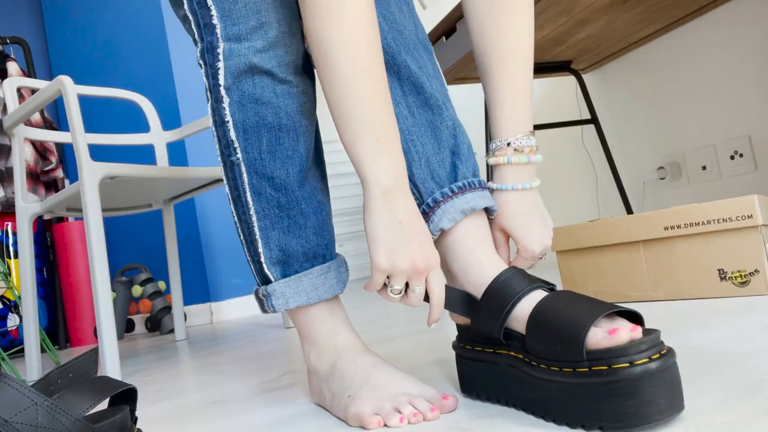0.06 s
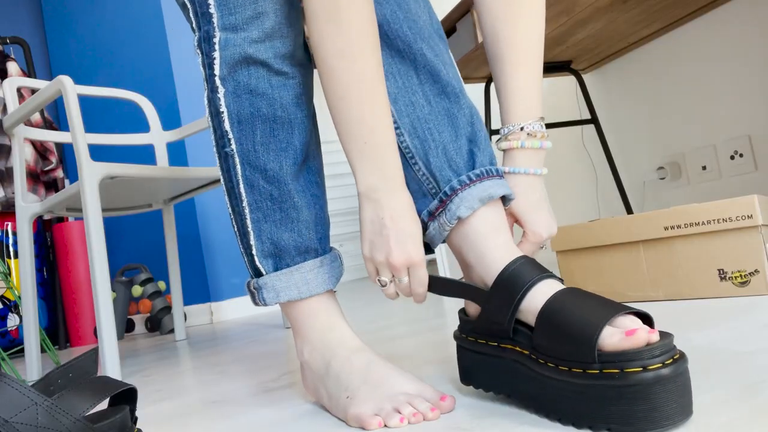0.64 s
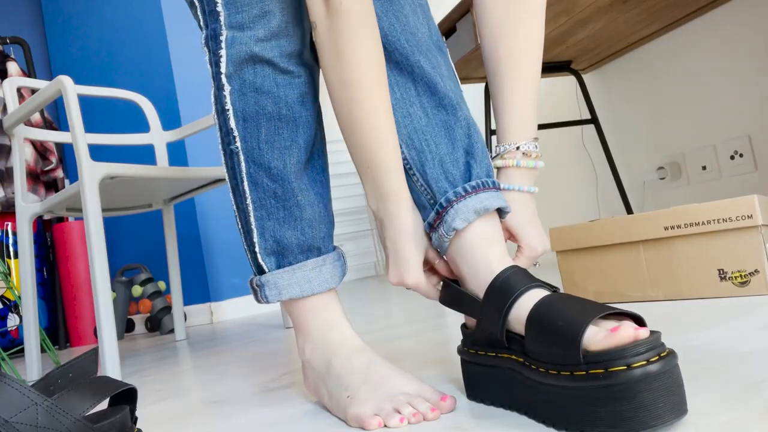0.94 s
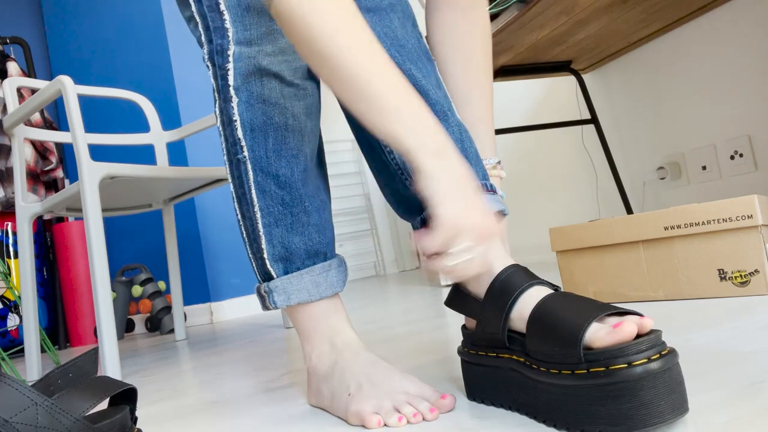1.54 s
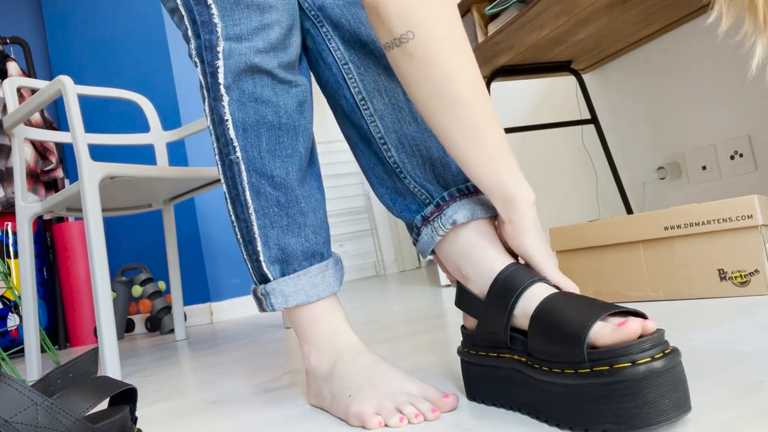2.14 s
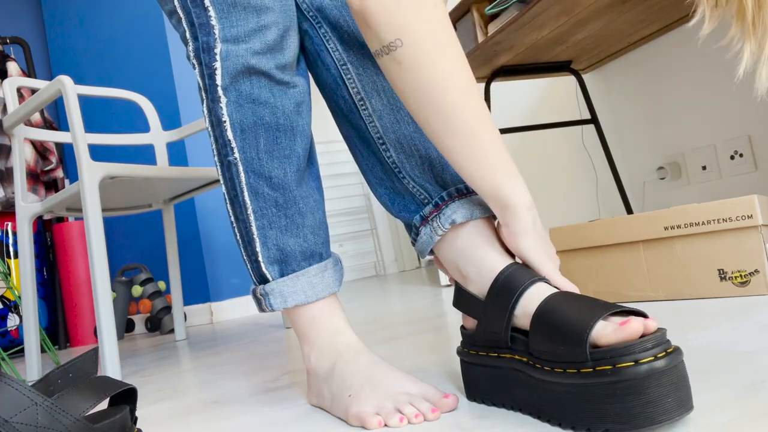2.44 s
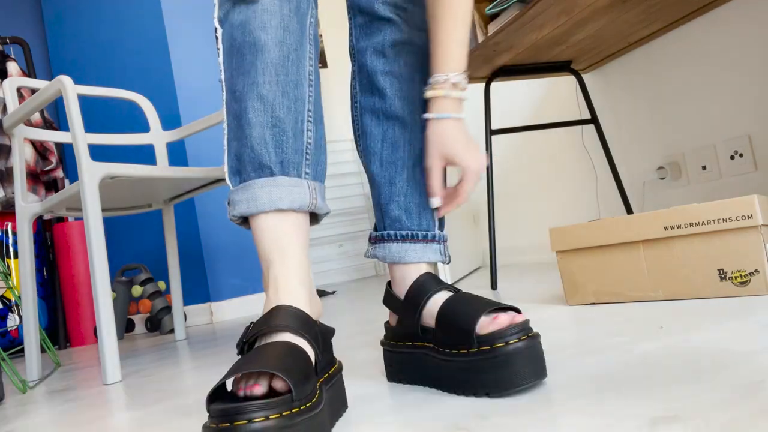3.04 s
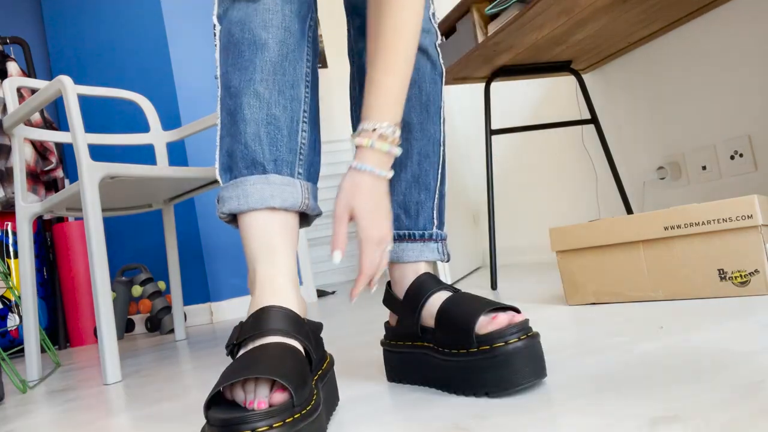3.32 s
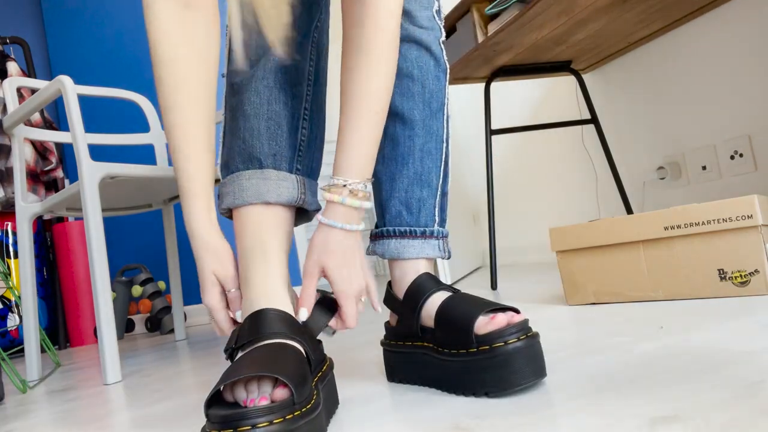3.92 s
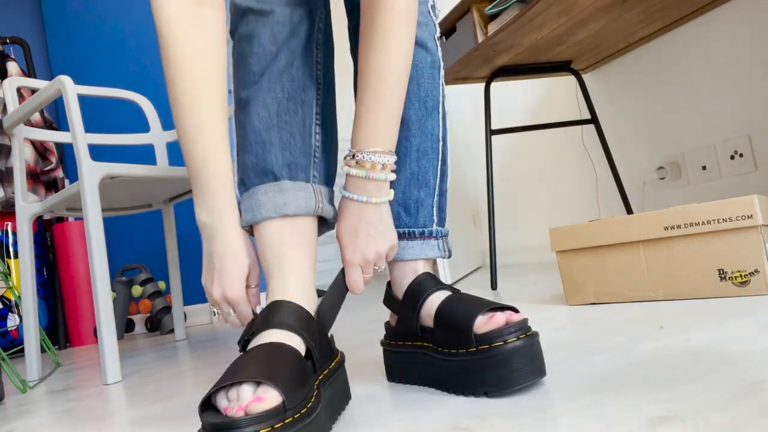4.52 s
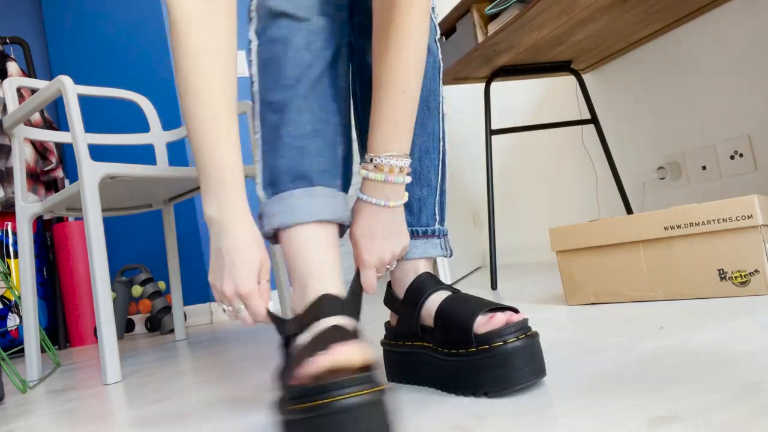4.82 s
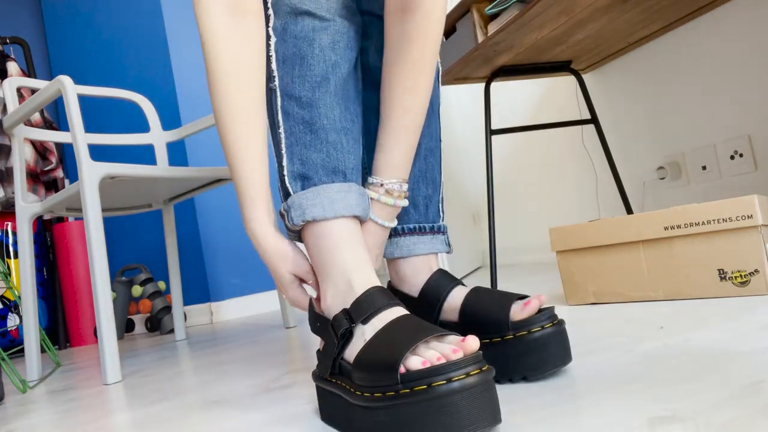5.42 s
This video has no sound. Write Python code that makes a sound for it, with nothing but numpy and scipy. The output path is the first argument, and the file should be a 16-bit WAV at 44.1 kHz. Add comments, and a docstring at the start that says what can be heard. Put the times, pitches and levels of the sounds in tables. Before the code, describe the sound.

Platform sandals are put on in a small room, heard from a microphone on the floor close to the feet. From the start, leather straps rub on skin and denim cuffs swish in short, soft strokes, while buckles and bead bracelets tick irregularly. A rubber sole thuds dully at about 0.3 and 0.85 seconds. Light ticks continue until about 2.3 seconds, followed by a brief lull. At 3.1 seconds a thick sole lands on the hard floor with a loud, hollow clop and a short low boom, and the rubbing picks up. A joint gives one small dry crack at 3.9 seconds. Another loud clop comes at 4.2, then slightly softer ones at 4.6 and 5.2, with a low thud at 4.9. Sharper buckle ticks fall near 4.1 and 5 seconds among busier strap rubbing. Faint, rumbling room tone lies underneath throughout.

```python
"""Thick rubber soles clop on a hard floor as platform sandals are put on in a small room.
The microphone sits on the floor, close to the feet, where each landing sets the low room modes booming.
Leather straps and denim cuffs rub in short strokes, buckles and bead bracelets tick,
and a joint cracks once. Faint room tone lies underneath."""
import sys
import numpy as np
from scipy import signal
from scipy.fft import rfft, irfft, next_fast_len
from scipy.io import wavfile
from scipy.ndimage import uniform_filter1d, map_coordinates

SR = 44100
rng = np.random.default_rng(int(sys.argv[2]) if len(sys.argv) > 2 else 0)


def materialize(psi):
    """Save the field psi as 16-bit PCM at rate SR to the path in sys.argv[1].

    A 1-D psi becomes a single channel; in a 2-D psi each row is a channel.
    """
    bounded = np.clip(np.atleast_2d(psi).T, -1, 1)
    quanta = np.round(bounded * 32767).astype(np.int16)
    wavfile.write(sys.argv[1], SR, quanta)


N = 249667

# how alike the room sounds at the left and right microphone ports: frequency_hz, coherence
COHERENCE = [(60, 0.85), (150, .88), (250, 0.62), (500, 0), (1500, 0.056), (6000, 0)]
# hollow resonance of rubber brushing the floor: pitch_hz, width_hz, level_db
SCUFF_MODES = [(790, 500, 0)]


def amp(db):
    return 10 ** (np.asarray(db) / 20)


def unit(x):
    return x / np.sqrt(np.mean(x ** 2) + 1e-20)


def along(points, hz):
    """Interpolate (frequency_hz, value) points on a log frequency axis."""
    frequencies, values = np.transpose(points)
    return np.interp(np.log(hz + 1), np.log(frequencies + 1), values)


def arch(u):
    """Rises and falls once while u goes from 0 to 1."""
    return np.sin(np.pi * np.clip(u, 0, 1))


def wobble(rate_hz):
    """A smooth random curve."""
    knots = rng.standard_normal(int(N * rate_hz / SR) + 4)
    return map_coordinates(knots, [np.arange(N) * rate_hz / SR])


def add(track, start_s, sound):
    """Mix a sound into the track."""
    part = track[:, max(round(start_s * SR), 0):][:, :sound.shape[1]]
    part += sound[:, :part.shape[1]]


def filtered(x, response):
    """Multiply the spectrum of x by response(hz)."""
    n = x.shape[-1]
    size = next_fast_len(n + SR // 4)
    return irfft(rfft(x, size) * response(np.fft.rfftfreq(size, 1 / SR)), size)[..., :n]


def pulse(gain, size=4096):
    """The shortest causal pulse with the given gain at each frequency."""
    cepstrum = irfft(np.log(np.maximum(gain(np.fft.rfftfreq(size, 1 / SR)), 1e-6)))
    cepstrum[1:size // 2] *= 2
    cepstrum[size // 2 + 1:] = 0
    return irfft(np.exp(rfft(cepstrum)))


def resonances(modes, hz):
    """Gain of a set of damped resonances."""
    return np.sqrt(sum(abs(amp(db) * hz * width / (pitch ** 2 - hz ** 2 + 1j * hz * width)) ** 2
                       for pitch, width, db in modes))


def port_angle(hz):
    """Phase angle between the microphone ports: shorter waves arrive further out of step."""
    return np.arccos(np.clip(along(COHERENCE, hz), -1, 1))


def diffuse(pair):
    """Two unrelated signals become a diffuse field: alike in the bass, unrelated in the treble."""
    weights = lambda hz: np.array([np.cos(port_angle(hz) / 2), np.sin(port_angle(hz) / 2)])
    mid, side = filtered(pair, weights)
    return np.array([mid + side, mid - side])


def coloured(pair, spectrum):
    """A diffuse field of rms 1 with the given spectrum."""
    return unit(diffuse(filtered(pair, lambda hz: amp(along(spectrum, hz)))))


def room(sound, pan_db, early_db, tail_db, onset_s=0.0018, early_t60_s=0.085):
    """Direct sound (positive pan is left), echoes, furniture scatter, standing waves and diffuse tail."""
    # decay of the tail: frequency_hz, t60_s
    decay = [(60, 0.39), (200, 0.23), (600, 0.18), (1200, 0.28), (3000, 0.19), (8000, 0.26), (15000, 0.16)]
    # first echoes off the floor and a box: delay_s, left_gain, right_gain
    echoes = [(.0029, 0.13, 0.049), (.0037, .12, 0.34)]
    # modes of room and floor: pitch_hz, level_db, t60_s, build_s
    standing_waves = [(55.5, 16.5, 0.21, 0.018), (80.8, 10.5, 0.13, .02), (115.3, 10, 0.15, .02),
                      (219, 7.5, 0.13, 0.018), (303, 6, .17, 0.0059), (431.7, 6, 0.085, 0.029),
                      (585, 0.5, 0.16, 0.0043), (673.5, 6, .12, 0.0016), (822.4, 11, 0.095, 0.0045),
                      (957, 2.5, 0.11, .004)]
    t = np.arange(SR // 2) / SR
    hz, frame_s, bands = signal.stft(rng.standard_normal((2, len(t))), SR, nperseg=256)
    bands *= amp(-60 * frame_s / along(decay, hz)[:, None])
    tail = signal.istft(bands, SR, nperseg=256)[1][:, :len(t)]
    early = rng.standard_normal((2, len(t))) * amp(-60 * t / early_t60_s)
    swell = 1 - np.exp(-(t / onset_s) ** 2)
    scatter = amp(tail_db) * unit(tail * swell) + amp(early_db) * unit(early * swell)
    response = diffuse(scatter) / np.sqrt(len(t))
    response[:, 0] += amp([pan_db / 2, -pan_db / 2])
    for delay_s, left, right in echoes:
        response[:, round(delay_s * SR)] += [left, right]
    for pitch_hz, db, t60_s, build_s in standing_waves:
        envelope = amp(-60 * t / t60_s) * (1 - np.exp(-t / build_s))
        phase = port_angle(pitch_hz) * rng.choice([-.5, .5]) * np.array([[1], [-1]])
        wave = np.sin(2 * np.pi * pitch_hz * t + phase)
        response += 2 * amp(db + rng.normal()) * envelope / envelope.sum() * wave
    return signal.fftconvolve(sound[None], response, axes=1)


def room_tone(pan_db=-4.0, hiss_db=-76):
    """The room's low rumble, a little to the right, and a faint hiss."""
    # rise and fall of the rumble: time_s, level_db
    rumble_levels = [(0.0, -55.5), (0.72, -60.5), (0.94, -54), (1.35, -60.5), (2.85, -63.5), (3.15, -53),
                     (3.77, -61.5), (4.11, -55), (5.2, -54.5), (5.66, -64.5)]
    # colour of the rumble: frequency_hz, density_db
    rumble_spectrum = [(15, -30), (30, -1), (52, 5), (105, 0.5), (150, -7), (215, -9), (310, -12.5),
                       (450, -37.5), (800, -39), (2000, -72.5)]
    # colour of the hiss: frequency_hz, density_db
    hiss_spectrum = [(100, -1.5), (330, 4.5), (550, 5.5), (1200, -1), (2500, -6), (5000, -11.5),
                     (9000, -15.5), (15500, -31.5)]
    rumble_db = np.interp(np.arange(N) / SR, *np.transpose(rumble_levels))
    rumble = amp(rumble_db) * coloured(rng.standard_normal((2, N)), rumble_spectrum)
    hiss = amp(hiss_db) * coloured(rng.standard_normal((2, N)), hiss_spectrum)
    return rumble * amp([[pan_db / 2], [-pan_db / 2]]) + hiss


def patchy_colour(pair, depth_db):
    """Faint random patches of tone come and go in the rubbing noise."""
    bands = signal.stft(pair, nperseg=512)[2]
    patches = uniform_filter1d(rng.standard_normal(bands.shape[1:]), size=4, axis=0)
    patches = uniform_filter1d(patches, size=10, axis=1)
    return signal.istft(bands * amp(depth_db * unit(patches)), nperseg=512)[1][:, :N]


def friction(spectrum, catches_per_s, catch_db, uneven_db):
    """Smooth sliding plus tiny catches of the fibres."""
    catches = (rng.random(N) < catches_per_s / SR) * rng.standard_normal((2, N))
    slide = patchy_colour(rng.standard_normal((2, N)) + amp(catch_db) * unit(catches), depth_db=1.5)
    return unit(coloured(slide, spectrum) * amp(uneven_db * wobble(rate_hz=60)))


def stroke_levels(speed_exponent=0.55, linger_db=-5.5, linger_t60_s=0.45):
    """Amplitudes of leather, denim and fizz: each stroke swells with its speed and trails off."""
    # a hand, strap or cuff slides: start_s, length_s, leather_db, denim_offset_db, fizz_offset_db
    strokes = [(0, 0.026, -58.5, -7, -11), (0.056, 0.11, -67.5, -2.5, -11), (0.116, 0.084, -58, -3.5, -8.5),
               (0.187, .06, -66.5, -6, -24), (0.248, .14, -65, 0, -8.5), (0.44, 0.072, -65, -1, -9),
               (0.58, 0.088, -67, -12, -21), (0.675, 0.24, -80.5, 0.5, -6), (0.794, 0.095, -55.5, -6, -8),
               (0.897, 0.15, -71, 4.5, -4), (1.04, 0.15, -74, 4, 5), (1.135, 0.28, -73, 3, -7.5),
               (1.437, 0.16, -77, 1, 1), (1.773, 0.13, -81.5, 10, 11), (1.891, 0.08, -69.5, 0.5, -7),
               (2.164, 0.09, -70, -3, -14), (2.923, .1, -63, -5, -2.5), (2.993, .15, -51.5, -4, -6.5),
               (3.165, 0.099, -61.5, -3, -9.5), (3.226, 0.09, -56.5, -9, -21), (3.33, 0.45, -72, -6.5, -13),
               (3.6, 0.34, -68, -5, -18.5), (3.722, 0.075, -64.5, -13.5, -34),
               (3.848, 0.11, -60, -4.5, -9.5), (4.038, 0.11, -70, -2, 4), (4.098, 0.22, -52, -7.5, -8.5),
               (4.139, 0.019, -51, -18, -20.5), (4.343, 0.2, -71.5, -5.5, -14),
               (4.472, 0.17, -52, -5, -8.5), (4.716, 0.059, -60.5, -5, -5), (4.79, 0.2, -56, -3.5, -16),
               (4.934, .045, -49.5, -2.5, -6.5), (5.013, 0.16, -50.5, -5, -12),
               (5.175, 0.12, -56.5, -6, -7.5), (5.37, 0.23, -81, 7.5, 4)]
    t, power = np.arange(N) / SR, np.zeros((3, N))
    for start_s, length_s, db, denim_offset_db, fizz_offset_db in strokes:
        speed = arch(t[:round(length_s * SR)] / length_s)
        peaks = amp([[db], [db + denim_offset_db], [db + fizz_offset_db]])
        add(power, start_s, (peaks * speed ** speed_exponent) ** 2)
    pole = amp(-60 / (linger_t60_s * SR)) ** 2
    lingering = signal.lfilter([1 - pole], [1, -pole], power)
    return np.sqrt(power + amp(linger_db) ** 2 * lingering)


def rubbing():
    """Straps drag dully over skin while the denim cuffs swish."""
    # leather on skin: frequency_hz, density_db
    leather_spectrum = [(150, -19), (350, -1), (750, -1.5), (1300, -1.5), (1700, -3), (2300, -3.5),
                        (3200, -14.5), (6000, -55), (12000, -58.5)]
    # swish of denim: frequency_hz, density_db
    denim_spectrum = [(900, -34), (2000, -5), (2900, 2.5), (4500, 1.5), (6300, -4.5), (8500, -7),
                      (14000, -54)]
    # fizz of fibres: frequency_hz, density_db
    fizz_spectrum = [(3500, -21), (6000, -8.5), (8000, 0), (12000, -4), (15500, -10)]
    leather, denim, fizz = stroke_levels()
    return (leather * friction(leather_spectrum, catches_per_s=630, catch_db=-7.5, uneven_db=1.0)
            + denim * friction(denim_spectrum, catches_per_s=120, catch_db=-10.0, uneven_db=2.0)
            + fizz * friction(fizz_spectrum, catches_per_s=160, catch_db=-13.5, uneven_db=2.5))


def joint_crack(start_s=3.9003, gain_db=-16.5, muffle_hz=2600):
    """One dry, hollow crack as the legs bend; flesh muffles its top."""
    # resonances of the joint: pitch_hz, width_hz, level_db
    modes = [(724, 370, -6.5), (1195, 120, 4.5), (1545, 190, 4), (2150, 250, -7.5), (2700, 290, -45)]
    out = np.zeros((2, N))
    snap = pulse(lambda hz: resonances(modes, hz) / (1 + (hz / muffle_hz) ** 8) * hz / (hz + 400))
    crack = room(snap / abs(snap).max(), pan_db=0, early_db=-2.0, tail_db=-8.5, early_t60_s=0.04)
    add(out, start_s, amp(gain_db) * crack)
    return out


def buckle_ticks(chatter_db=2, chatter_s=0.003, ring_db=5, ring_q=14):
    """Each contact snaps, chatters briefly and rings the buckle in new proportions."""
    # buckle, strap and bead contacts: start_s, level_db, tilt_db_per_octave, ring_hz
    contacts = [(0.056, -29, -7, 1670), (0.335, -20.5, -2.5, 2070), (0.4648, -25, -3, 2320),
                (0.82, -22, -4.5, 1590), (0.851, -19, -5, 1130), (0.954, -22, -3.5, 2390),
                (1.1542, -23, -1, 3900), (1.325, -35, -2, 2820), (1.357, -36.5, -3, 2730),
                (1.574, -33.5, -11, 1000), (1.917, -26, 0.5, 3300), (2.094, -44.5, -5, 2680),
                (2.281, -19, -4, 4230), (2.485, -41, -6, 1480), (2.544, -43.5, -6.5, 1860),
                (2.9277, -32, -3, 2275), (3.474, -36.5, 9.5, 8800), (3.746, -24.5, -10.5, 2500),
                (4.1064, -14.5, -2.5, 1390), (4.264, -22, 4, 7600), (4.4786, -18, -9.5, 1830),
                (4.9427, -15, -5, 2115), (5.018, -17, -3.5, 3050)]
    # a buckle damped by its strap: pitch_hz, width_hz, level_db
    buckle_modes = [(1170, 86, 1.5), (1728, 200, -0.5), (2300, 610, -2), (3280, 250, -7.5),
                    (4520, 350, -1.5), (4940, 320, -10), (7660, 1200, -9), (11900, 1500, -9.5)]
    out, t = np.zeros((2, N)), np.arange(SR // 12) / SR
    for start_s, db, tilt, ring_hz in contacts:
        modes = [(hz * np.exp(rng.normal(0, .02)), width, level + rng.normal(0, 1.5))
                 for hz, width, level in buckle_modes]
        modes.append((ring_hz, ring_hz / ring_q, ring_db))  # the struck part rings most
        ring = pulse(lambda hz: resonances(modes, hz) * amp(tilt * np.log2((hz + 300) / 3000)))
        chatter = unit(rng.standard_normal(len(t)) * np.exp(-t / chatter_s))
        force = amp(chatter_db) * chatter / np.sqrt(len(t))
        force[0] += 1  # the snap
        tick = room(signal.fftconvolve(ring, force), pan_db=-1, early_db=4.5, tail_db=-3.5, onset_s=.002)
        add(out, start_s, amp(db) * tick / np.linalg.norm(tick))
    return out


def scuff(lead_s):
    """A short hollow brush of rubber that swells for lead_s, until the sole is down, then fades."""
    t = np.arange(SR // 20) / SR
    brush = filtered(rng.standard_normal(len(t)), lambda hz: resonances(SCUFF_MODES, hz) ** 2)
    brush *= arch(t / (2 * lead_s))
    return np.array([brush, brush]) / np.linalg.norm(brush)


def sole_clops(thud_hz=100, boom_q=4, lag_s=0.0045, lag_hz=200, scuff_lead_s=0.012, scuff_db=-36):
    """The sole scuffs, then slaps. A softer landing loses its top; weight makes the floor thud."""
    # a sole meets the floor: start_s, gain_db, hardness_hz, weight_db, boom_hz, boom_db, pan_db
    landings = [(0.323, -0.5, 344, 27, 87.2, -9, -9), (0.3362, -.5, 290, 17, 150, 17, 6),
                (0.8502, 6.5, 430, 16.5, 137, 14.5, -2), (1.868, -20.5, 540, 29, 380, 18.5, 3),
                (3.061, 29, 954, -11.5, 116, 13.5, 6), (4.106, -6.5, 578, -8.5, 430, 16, 10),
                (4.2030, 27.5, 1300, -2, 210, 6.5, 1.5), (4.6354, 20.5, 970, 3, 228, 11, 5.5),
                (4.943, 1, 700, 21.5, 107, 8.5, -1), (5.2227, 21.5, 920, 2.5, 230, 10.5, -0.5)]
    # slap of a rubber sole: frequency_hz, level_db
    sole_spectrum = [(25, -39), (55, -17.5), (130, -13), (260, -7), (400, -6.5), (650, -3.5), (850, -5),
                     (1100, -14.5), (1500, -26), (2200, -21), (4000, -29), (9000, -23.5), (16000, -27.5)]
    out = np.zeros((2, N))
    # bending waves in the floor: the lows travel slower, so each clop falls in pitch
    bending = lambda hz: np.exp(-2j * np.pi * lag_s * lag_hz * np.log1p(hz / lag_hz))
    for start_s, db, hardness_hz, weight_db, boom_hz, boom_db, pan_db in landings:
        contact = lambda hz: 1 / np.sqrt(1 + (hz / hardness_hz) ** 4)
        thud = lambda hz: amp(weight_db / (1 + (hz / thud_hz) ** 2))
        boom = lambda hz: np.hypot(1, resonances([(boom_hz, boom_hz / boom_q, boom_db)], hz))
        slap = pulse(lambda hz: amp(along(sole_spectrum, hz)) * contact(hz) * thud(hz) * boom(hz))
        clop = room(filtered(slap, bending), pan_db, early_db=0.5, tail_db=-4.5, early_t60_s=0.051)
        add(out, start_s, amp(db) * clop)
        scuff_gain = amp(db + scuff_db) * contact(SCUFF_MODES[0][0])
        add(out, start_s - scuff_lead_s, scuff_gain * scuff(scuff_lead_s))
    return out


def scene():
    return sole_clops() + buckle_ticks() + joint_crack() + rubbing() + room_tone()


def record(dry):
    """The microphone ports notch the treble; nothing passes above the band limit."""
    # response of the microphone: frequency_hz, gain_db
    port_response = [(8800, -0.5), (9500, -4), (10100, -20.5), (10900, 0), (12000, -2), (13200, -1.5),
                     (14000, -21.5), (15200, -3.5)]
    top_hz = 15760
    return filtered(dry, lambda hz: amp(along(port_response, hz)) * (hz < top_hz))


dry = scene()
out = record(dry)
materialize(out)
```